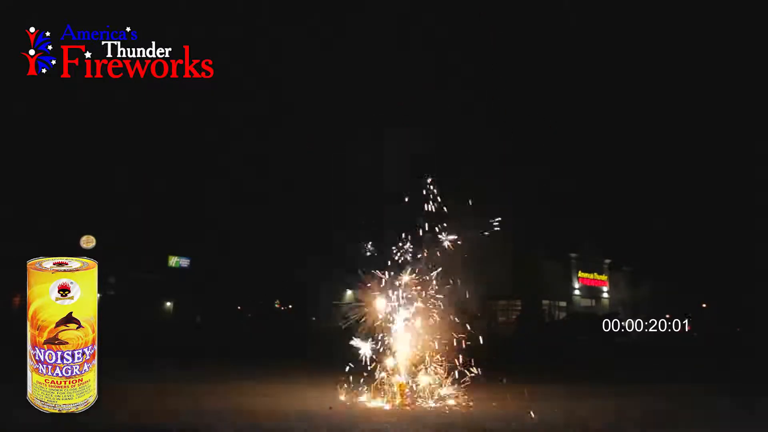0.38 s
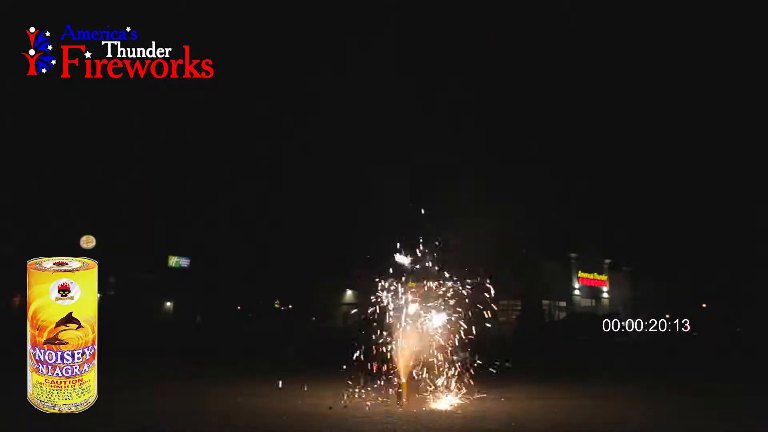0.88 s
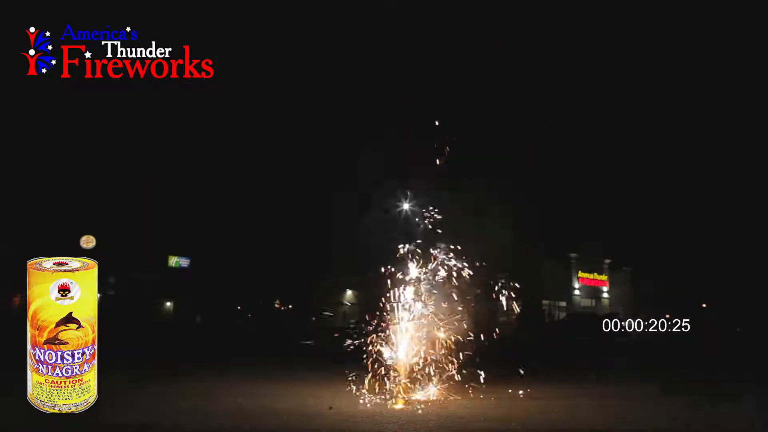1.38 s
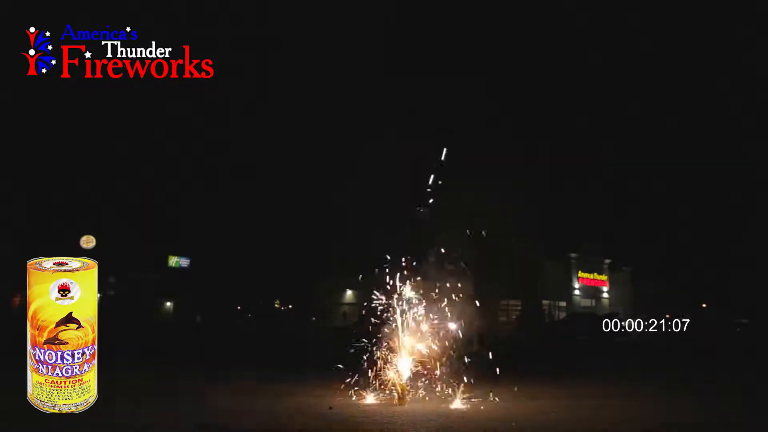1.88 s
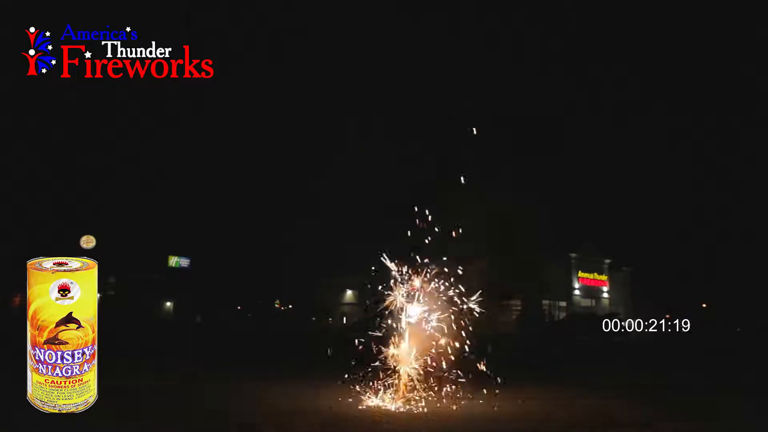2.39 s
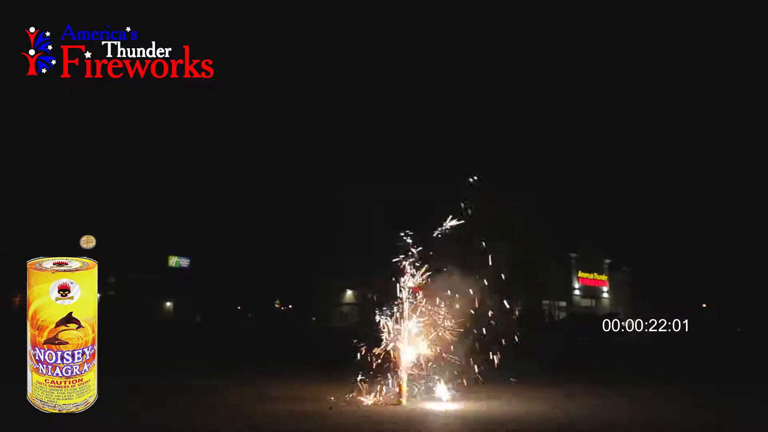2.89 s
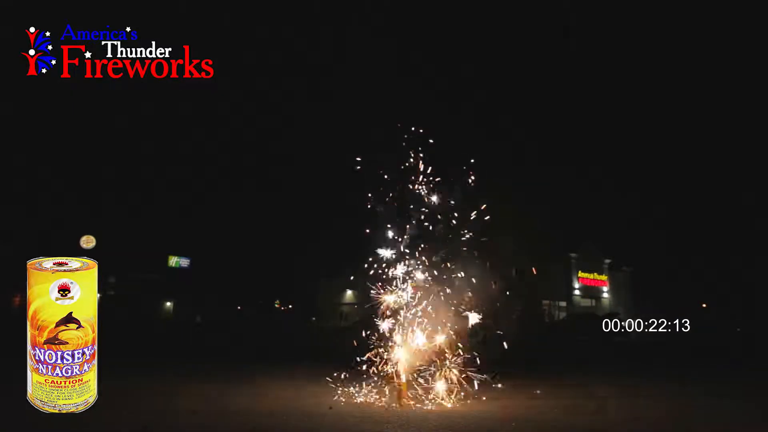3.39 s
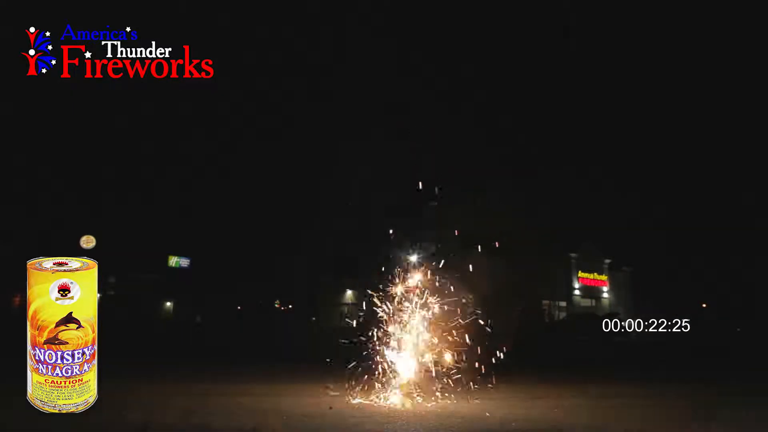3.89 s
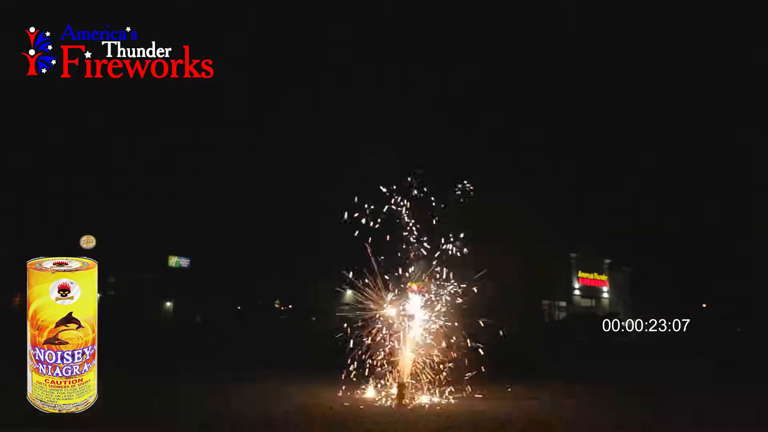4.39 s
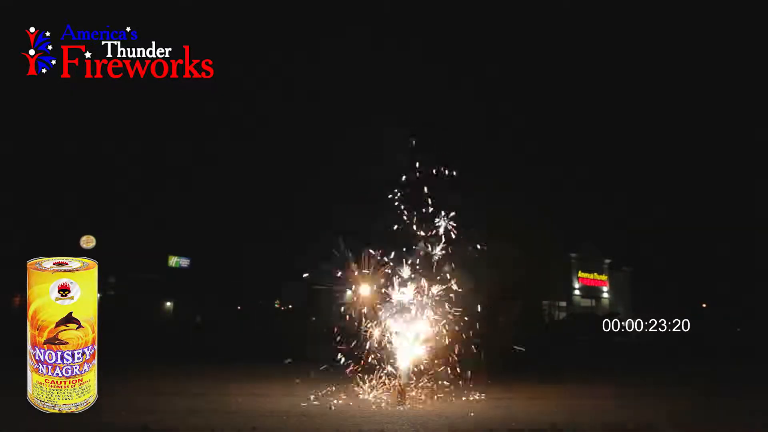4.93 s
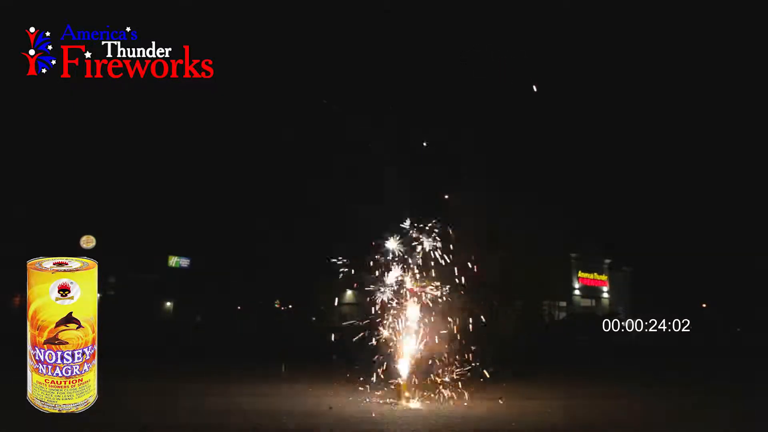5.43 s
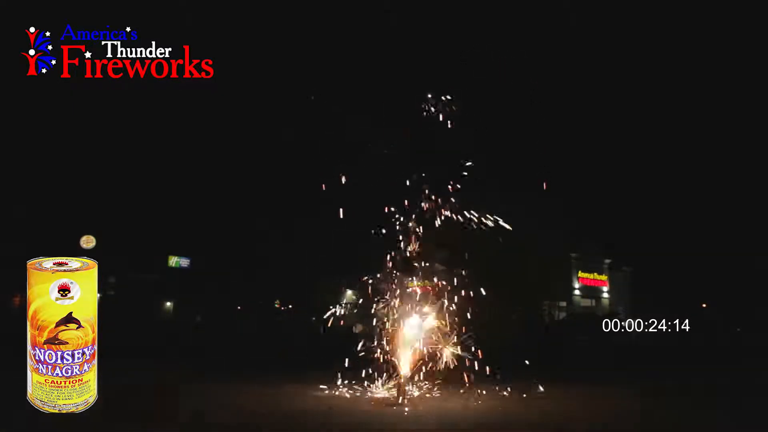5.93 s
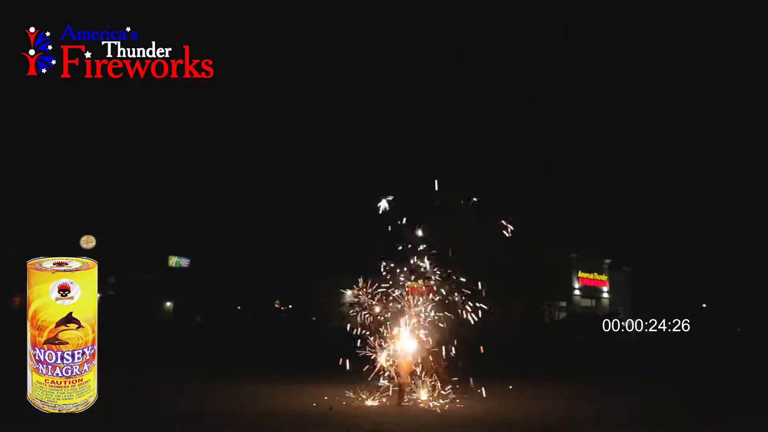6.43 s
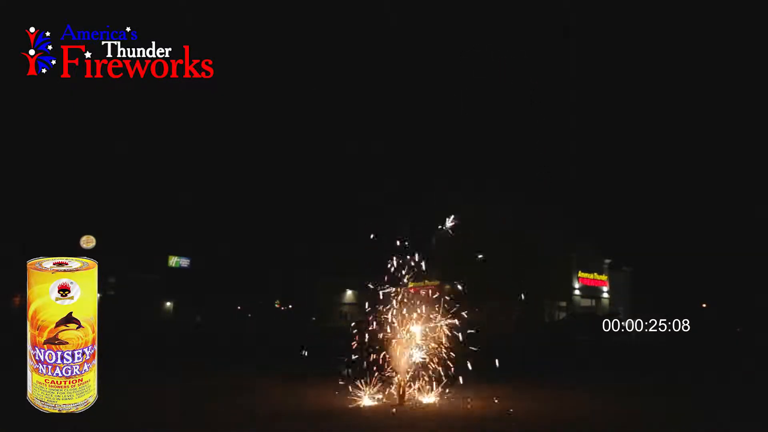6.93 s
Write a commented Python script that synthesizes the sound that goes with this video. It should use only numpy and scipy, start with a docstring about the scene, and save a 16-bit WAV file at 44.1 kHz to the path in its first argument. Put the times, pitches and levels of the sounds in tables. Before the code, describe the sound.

From the first moment a shrill whistle dominates, starting around 5 kHz and gliding down to about 4 kHz at 1 s, 3.3 kHz at 2 s and 2.9 kHz at 3 s. It flutters with a rough edge, weakens sharply after 2.7 s, sputters and is practically gone by 3.5 s, leaving a barely audible trace until nearly 4 s. Beneath it a fountain jet hisses steadily and fine sparks snap in uneven clumps. Loud, dry star bursts crack irregularly from the start, each with a quick ground slap, wall echoes, a short grainy tail and a small low thump; a few thump deeper, notably near 2 and 2.5 s. From 4 to 6.15 s bursts come thick and hard, overloading the microphone. Afterwards only weak pops, snaps and hiss continue to 7 s over faint outdoor rumble.

```python
"""A whistle charge sings in its tube and sinks in pitch as the tube burns empty, in a fountain firework at night.
The fountain stands on hard ground some metres from one microphone: its jet hisses and its sparks snap in clumps.
Crackling stars burst in the air, each heard again off the ground and off nearby walls, with a low thump.
Tones make the whistle, filtered impulses the bursts and snaps, coloured noise the jet and the night's rumble.
The loud bursts overload the microphone input."""
import sys
import numpy as np
from scipy import signal
from scipy.fft import rfft, irfft
from scipy.io import wavfile
from scipy.ndimage import uniform_filter1d, map_coordinates

SR = 44100
rng = np.random.default_rng(int(sys.argv[2]) if len(sys.argv) > 2 else 0)


def natural_amplitude(level_db):
    """Convert a level in decibels to a linear amplitude factor, elementwise."""
    exponent = np.asarray(level_db, float) / 20
    return 10 ** exponent


def wav_record(signal):
    """Record a signal, one row per channel, as 16-bit PCM in the file named by sys.argv[1]."""
    frames = np.transpose(np.atleast_2d(signal))
    bounded = np.clip(frames, -1, 1)
    # unit amplitude maps onto the largest positive 16-bit level
    quanta = np.round(bounded * 32767).astype(np.int16)
    wavfile.write(sys.argv[1], SR, quanta)


N = 310905  # length [samples]


def unit(x):
    """Scales to rms 1."""
    return x / np.sqrt(np.mean(x ** 2) + 1e-20)


def along(points, hz):
    """Reads (frequency [Hz], value) points on a log frequency axis."""
    f, v = np.transpose(points)
    return np.interp(np.log(hz + 1), np.log(f + 1), v)


def curves(rows):
    """Gives one value per sample for each column after the time."""
    s, *columns = np.transpose(rows)
    return [np.interp(np.arange(N) / SR, s, column) for column in columns]


def wobble(rate):
    """Draws a smooth random curve through normal knots, rate knots a second."""
    knots = rng.standard_normal(int(N * rate / SR) + 4)
    return map_coordinates(knots, [np.arange(N) * rate / SR])


def causal(points, size=2048):
    """Turns a spectrum into its minimum-phase impulse response, peak 1, by folding the cepstrum."""
    cepstrum = irfft(np.log(natural_amplitude(along(points, np.fft.rfftfreq(size, 1 / SR)))), size)
    cepstrum[1:size // 2] *= 2
    cepstrum[size // 2 + 1:] = 0
    response = irfft(np.exp(rfft(cepstrum)), size)[:size // 2]
    return response / np.abs(response).max()


def spikes(s, gain):
    """Places single-sample impulses at the given seconds."""
    return np.bincount(np.clip(np.round(s * SR).astype(int), 0, N - 1), gain, N)


def patchy(spectrum, patchy_db):
    """Colours noise and gives it random gain in patches of time and frequency; rms 1."""
    hz, _, z = signal.stft(rng.standard_normal(N), SR, nperseg=512)
    field = uniform_filter1d(rng.standard_normal(z.shape), 12, 0)  # smooth over frequency
    field = uniform_filter1d(field, 5, 1)  # smooth over time
    gain_db = along(spectrum, hz)[:, None] + patchy_db * unit(field)
    return unit(signal.istft(z * natural_amplitude(gain_db), SR, nperseg=512)[1][:N])


# low rumble of the night, shape of its spectrum: (frequency [Hz], relative level [dB per Hz])
RUMBLE_SPECTRUM = [(20, -5), (60, -3), (140, -2), (400, -12), (1500, -14.5), (4000, -38)]


def rumble():
    """The night's low rumble around the microphone: coloured noise that drifts slowly in level."""
    return natural_amplitude(-55.5 + wobble(2.52)) * patchy(RUMBLE_SPECTRUM, patchy_db=1.5)


# spray of the fountain, which sets the size of hiss and snaps: (time [s], relative strength [dB])
SPRAY_STRENGTH = [(0.0, -42), (0.55, -40), (0.88, -41), (1.31, -41), (2.18, -42.5), (2.88, -41), (3.4, -42),
                  (3.9, -40.5), (5.03, -38.5), (5.4, -46), (5.73, -39), (6.14, -46), (7.05, -43)]
# hiss of the jet, shape of its spectrum: (frequency [Hz], relative level [dB per Hz])
HISS_SPECTRUM = [(250, -36), (450, -7.5), (1900, -8.5), (2300, -11), (3400, -5.5), (7500, -7), (11000, -22),
                 (14000, -23), (16000, -18), (17000, -40)]


def hiss():
    """The jet's hiss: coloured noise that follows the spray and flickers."""
    level_db = curves(SPRAY_STRENGTH)[0] - 12 + 0.98 * wobble(38)
    return natural_amplitude(level_db) * patchy(HISS_SPECTRUM, patchy_db=-1.0)


# a small snap at the microphone, thinner than a burst: (frequency [Hz], relative level [dB])
SNAP_SPECTRUM = [(100, -23), (1200, -16.5), (2500, -12), (4500, -8), (7300, -3), (10500, -11.5),
                 (14000, -20), (16000, -20), (20000, -80.5)]


def sparks(per_s=300, over_db=4, clump_db=4):
    """Small random snaps in clumps, each with a ground echo and a short fizz; their size follows the spray."""
    draw = rng.random((4000, 3))  # one row a snap
    expected = np.cumsum(per_s * natural_amplitude(clump_db * wobble(45)) / SR)  # the rate swings, so snaps clump
    s = np.searchsorted(expected, np.cumsum(-np.log(1 - draw[:, 0]))) / SR
    extra_db = np.minimum(-4.5 * np.log(1 - draw[:, 1]), 13)  # many faint, few strong
    spray_db = np.interp(s, *np.transpose(SPRAY_STRENGTH))
    gain = natural_amplitude(spray_db + over_db + extra_db) * (s < N / SR)
    echo_s = 0.00012 + 0.00088 * draw[:, 2] ** 3
    train = spikes(s, gain) + spikes(s + echo_s, 0.76 * gain)
    t = np.arange(SR // 20) / SR
    fizz_decay = natural_amplitude(-31.0 - 120 * t / 0.017)  # a power, so it loses 60 dB in 17 ms
    fizz_power = signal.fftconvolve(spikes(s, gain ** 2), fizz_decay)[:N]
    train = train + np.sqrt(np.abs(fizz_power)) * rng.standard_normal(N)
    return -signal.fftconvolve(train, causal(SNAP_SPECTRUM))[:N]


# deep thumps heard under some of the biggest bursts: (time [s], level [dB])
DEEP_THUMPS = [(0.2649, -34.5), (1.9918, -21), (2.4706, -16.5), (4.1012, -25.5), (4.379, -31),
               (4.8659, -35), (4.962, -24), (5.0626, -29), (5.5206, -35), (5.6047, -25), (5.7779, -34),
               (6.0997, -30.5)]


def thumps(s, db, echo_ms):
    """Every burst pushes a little low air, heard at its ground echo; the deep thumps join in."""
    u = np.arange(SR // 20) / SR / 0.0021  # time in units of 2.1 ms
    push = (1 - u) * np.exp(-u) * (1 - np.exp(-u / 0.073))
    push = push / np.sqrt(np.sum(push ** 2) / (.009 * SR))  # as much energy as 9 ms at rms 1
    deep_s, deep_db = np.transpose(DEEP_THUMPS)
    blows = spikes(s + echo_ms / 1000, natural_amplitude(db - 55.5)) + spikes(deep_s, natural_amplitude(deep_db))
    return signal.fftconvolve(blows, push)[:N]


# walls and kerbs near the microphone that return each burst: (delay [ms], typical level before dulling [dB])
WALL_RETURNS = [(3.0, -75), (5.1, -41.5), (10.0, -39), (14.8, -31)]


def wall_echoes(s, db):
    """Late copies of each burst, uneven in level; rough walls return less treble."""
    returns = 0
    for ms, wall_db in WALL_RETURNS:
        uneven_db = 2.5 * rng.standard_normal(len(s))
        returns = returns + spikes(s + ms / 1000, natural_amplitude(db + wall_db + uneven_db))
    dull = np.exp(-2 * np.pi * 2500 / SR)  # one-pole low-pass at 2500 Hz
    return signal.lfilter([1], [1, -dull], returns)


# decay of the scattered sound around the place: (frequency [Hz], time to lose 60 dB [s])
SCATTER_DECAY = [(300, 0.055), (1500, 0.064), (7000, 0.066), (14000, 0.083)]


def scattered_tails(s, db):
    """A fresh grainy noise tail for each burst, dying at its own pace at each frequency."""
    size = SR // 8
    grain = natural_amplitude(0.75 * rng.standard_normal((len(s), size)))
    noise = rng.standard_normal((len(s), size)) * grain
    hz, t, z = signal.stft(noise, SR, nperseg=64)
    decay = natural_amplitude(-60 * t / along(SCATTER_DECAY, hz)[:, None])
    tails = signal.istft(z * decay, SR, nperseg=64)[1][:, :size]
    age = np.arange(size) / SR
    near_ground = natural_amplitude(6.5 - 60 * age / 0.0093)  # the ground nearby answers first
    tails = tails * (np.clip(age / 0.0021, 0, 1) + near_ground)
    out = np.zeros(N + size)
    for start, level, tail in zip(np.round(s * SR).astype(int), db, tails):
        out[start:start + size] += natural_amplitude(level - 35.5) * tail
    return out


# bursting stars: (time [s], impulse level before overload [dB], ground echo delay [ms])
STAR_BURSTS = [(0.0284, 11, .24), (0.2379, -9, .13), (0.2638, 15, 0.6), (0.372, -17, .17),
               (0.4321, 16.5, 0.74), (0.5429, -4, .16), (0.5702, 16, .51), (0.5868, 7.7, 0.67),
               (0.7974, -3.5, 0.16), (0.824, -14, 0.36), (0.8274, -7.5, 0.16), (1.2078, -4, .17),
               (1.22, -12, 0.37), (1.33, 10, 0.36), (1.3644, 13.5, 0.29), (1.4157, -4.5, 0.37),
               (1.6435, -6.5, 0.16), (1.658, -8, 0.17), (1.6783, -1, 0.22), (1.7588, 8.5, 0.38),
               (1.9683, -3, 0.37), (1.9908, 15.5, 0.37), (2.0031, 1, .16), (2.0563, 14, .16),
               (2.0953, 7.2, 0.6), (2.123, -11, 0.21), (2.3351, 12.5, 0.52), (2.4305, -7, .19),
               (2.4674, 15.5, 1.01), (2.4699, 15, 0.76), (2.5536, -7.5, .16), (2.6277, 8.5, 0.94),
               (2.8999, -4, 0.43), (2.9234, -8, 0.18), (3.012, -8.5, 0.37), (3.07, -9.5, .58),
               (3.313, 7.5, 0.63), (3.4921, -12.5, 0.36), (3.5319, 14, .64), (3.6667, -14, 0.64),
               (3.6997, 16.5, .88), (3.7459, -2.5, 0.16), (3.7734, -7.5, 0.2), (3.823, -7, 0.19),
               (3.9258, 8, .27), (3.9457, -20, .36), (3.9519, 12.5, 0.89), (4.0776, -0.5, 0.29),
               (4.1001, 16, 0.82), (4.1568, 15, 1.43), (4.2645, -0.5, 0.17), (4.3537, 10.5, 0.8),
               (4.3784, 14.5, .56), (4.4165, 13, 0.75), (4.499, 20, 0.87), (4.5081, -5, 0.38),
               (4.601, -2.5, 0.4), (4.622, 16, 0.85), (4.6484, 16, 0.78), (4.775, -3, 0.15),
               (4.7882, 13.5, 0.95), (4.8357, -18, 0.25), (4.8551, 13.5, 0.68), (4.8647, 4, .65),
               (4.8745, 17.5, 0.99), (4.898, 2.5, 0.39), (4.9605, 16.5, 1.17), (5.0559, -12, .36),
               (5.0613, 17, 0.82), (5.1092, -21, .14), (5.1265, 14.5, 0.69), (5.1853, 2.5, 0.33),
               (5.2209, -10, .59), (5.28, 8, 1), (5.3408, -2, 0.18), (5.3842, -4, 0.18),
               (5.4232, -6.5, 0.2), (5.5197, 14, 0.61), (5.5946, -17, .54), (5.6042, 15, 0.86),
               (5.6356, 7.5, .67), (5.691, 15, 1.2), (5.7172, 12, 0.55), (5.7205, 2, 0.14),
               (5.7588, -19, .15), (5.7777, 14, 0.27), (5.821, 10.5, 0.29), (5.8559, -7, .13),
               (5.8695, 14, 1.3), (5.9217, -5, 0.17), (6.0135, -15.5, 0.18), (6.0394, -21, .2),
               (6.0656, -7.5, 0.44), (6.093, 12, 0.72), (6.0988, 16.5, 0.68), (6.1206, 15.5, 0.65),
               (6.133, 9, 0.22), (6.3413, -24.5, 0.71), (6.3629, -7, 0.17), (6.3693, -4, 0.18),
               (6.4048, -19.5, 0.17), (6.4338, -21, 0.31), (6.4621, -12.5, 0.69), (6.5054, -10.5, .18),
               (6.5293, -9, 0.19), (6.5364, -6, .17), (6.5868, -21, .59), (6.5982, -6, 0.2),
               (6.6884, -17.5, 0.93), (6.695, -9.5, 0.46), (6.7464, -21.5, 0.17), (6.8663, -21, .84),
               (6.9317, -22, 0.57)]
# slower bursts, duller and with more knock: (time [s], level before dulling [dB], ground echo delay [ms])
SLOW_BURSTS = [(1.0665, -4.5, .58), (2.0463, -12, .39), (2.1951, -9, .19), (3.8742, -7, .38),
               (4.0139, -5.5, .45), (4.5709, -6.5, 1.16), (4.9993, -3.5, .38), (5.6726, -3, .88),
               (6.1708, -1.5, 1.06)]
# a burst as the microphone colours it: (frequency [Hz], relative level [dB])
BURST_SPECTRUM = [(60, -16.5), (300, -11), (520, -8), (780, -10), (1200, -7.5), (1650, -7.5), (2300, -10.5),
                  (3600, -6.5), (5000, -5.5), (7000, 0), (8500, -1.5), (10500, -11.5), (13500, -21),
                  (16000, -18), (20000, -106)]


def stars():
    """Bursts in the air as impulses, each with ground echo, wall echoes, scattered tail and thump."""
    s, db, echo_ms = np.transpose(np.vstack([STAR_BURSTS, SLOW_BURSTS]))
    dull_share = 0.61 * (np.arange(len(s)) >= len(STAR_BURSTS))  # part of a slower burst that lacks treble

    def with_ground(share):
        """A burst and its copy off the hard ground, 1 dB weaker."""
        return spikes(s, share * natural_amplitude(db)) + spikes(s + echo_ms / 1000, share * natural_amplitude(db - 1.0))

    soft = np.exp(-2 * np.pi * 2200 / SR)  # one-pole low-pass at 2200 Hz
    dull = natural_amplitude(4) * signal.lfilter([1], [1, -soft], with_ground(dull_share))
    train = scattered_tails(s, db)
    train[:N] += with_ground(1 - dull_share) + dull + wall_echoes(s, db)
    coloured = signal.fftconvolve(train, causal(BURST_SPECTRUM))[:N]
    return -coloured - thumps(s, db, echo_ms)


# whistle charge, levels before flutter: (time [s], pitch [Hz], fundamental rms [dB], octave rms [dB])
WHISTLE_COURSE = [(0.0, 5130, -27, -47), (0.07, 5012, -19, -47), (0.3, 4745, -19.5, -51.5),
                  (0.55, 4460, -24, -57), (0.63, 4314, -24, -55), (0.95, 3986, -20, -40),
                  (1.12, 3836, -23.5, -38), (1.27, 3700, -24, -30.5), (1.35, 3750, -20, -28),
                  (1.43, 3666, -24, -32.5), (1.62, 3578, -21.5, -30.5), (1.91, 3374, -23, -30),
                  (2.0, 3335, -24, -29.5), (2.23, 3220, -23.5, -33), (2.31, 3220, -26, -32.5),
                  (2.6, 3055, -27.5, -33.5), (2.85, 2947, -38.5, -32), (3.1, 2878, -36, -36.5),
                  (3.3, 2905, -41, -42), (3.41, 2800, -45.5, -60)]


def whistle():
    """The singing tube: five harmonics with pitch jitter and a rough skirt, sputtering once faint."""
    hz, first_db, octave_db = curves(WHISTLE_COURSE)
    since = np.arange(N) / SR - WHISTLE_COURSE[-1][0]
    spent = since > 0
    # the spent tube sings on faintly for half a second, fading by 12 dB/s
    hz = np.where(spent, 2890, hz)
    first_db = np.where(spent, -57 - 12 * since, first_db)
    octave_db = np.where(spent, first_db - 14, octave_db)
    # the third partial swings wider than the octave, with a floor that drops when the tube is spent
    third_db = -38 + 1.26 * (octave_db + 31) + 0.14 * (first_db + 28)
    third_db = np.maximum(third_db, -56 - 30 * spent)
    partials_db = [first_db, octave_db, third_db, third_db - 14, third_db - 36]
    jitter = .002 * wobble(60) + .0045 * wobble(300)
    phase = 2 * np.pi * np.cumsum(hz * (1 + jitter)) / SR
    faint = np.clip((-35.5 - first_db) / 10, 0, 1)
    flutter_db = 1.2 * wobble(34.89) + 0.6 * wobble(160) + 0.6 * wobble(8.75)
    flutter_db = flutter_db + 4 * faint * wobble(70)  # the sputter
    rough = 1 + 0.073 * wobble(700)  # breathy side bands
    tone = 0
    for k, level_db in enumerate(partials_db):
        own_db = 1.16 * k ** .5 * wobble(40.2)  # upper partials also flutter on their own
        tone = tone + natural_amplitude(level_db + flutter_db + own_db) * np.sin((k + 1) * phase)
    return np.sqrt(2) * rough * tone * (since < .5)


def scene():
    """Everything at one microphone."""
    return (rumble() + hiss() + sparks() + stars() + whistle())[None]


def low_pass(x):
    """Removes everything above the highest recorded frequency."""
    return signal.sosfilt(signal.butter(12, 16820, fs=SR, output="sos"), x)


def record(dry):
    """The microphone input clips, a fast gain control ducks after loud bursts, the band's ends roll off."""
    x = dry / (1 + np.abs(dry / 0.4) ** 6) ** (1 / 6)  # soft clip towards 0.4
    keep = np.exp(-1 / (0.031 * SR))  # 31 ms smoothing
    loudness = signal.lfilter([1 - keep], [1, -keep], np.maximum(np.abs(x) - .25, 0))
    x = x / (1 + 40 * loudness) ** .5
    x = signal.sosfilt(signal.butter(2, 70, "high", fs=SR, output="sos"), x)
    x = signal.sosfilt(signal.butter(3, 12500, fs=SR, output="sos"), x)
    x = signal.sosfilt(signal.cheby1(8, 1, 15900, fs=SR, output="sos"), x)  # steep upper band limit
    return low_pass(x)


dry = scene()
out = record(dry)
wav_record(out)
```